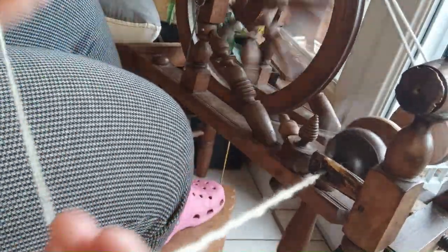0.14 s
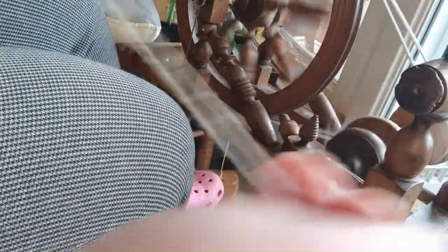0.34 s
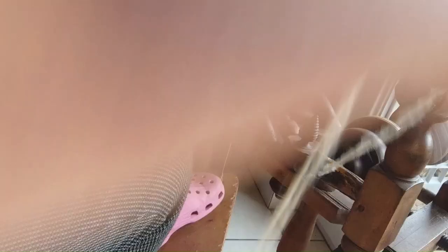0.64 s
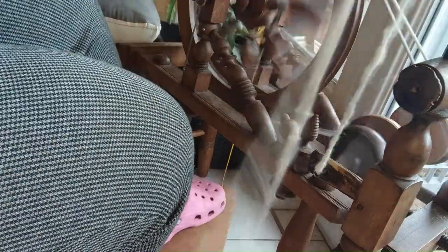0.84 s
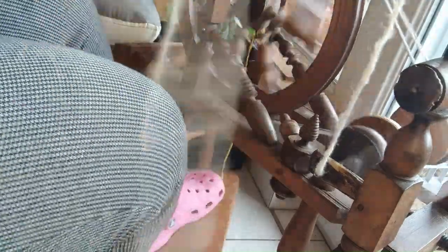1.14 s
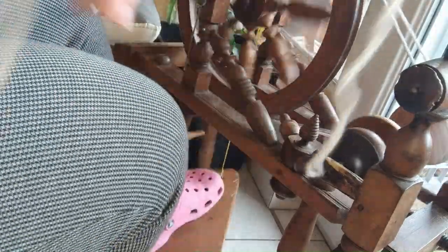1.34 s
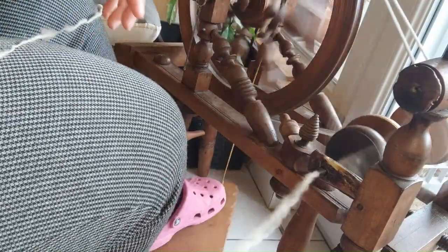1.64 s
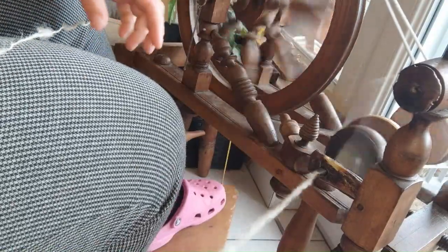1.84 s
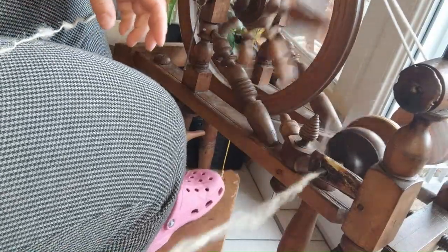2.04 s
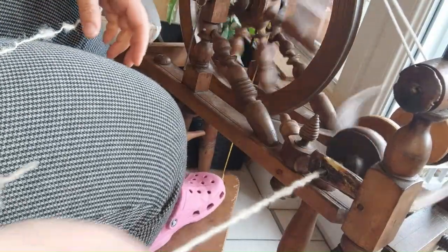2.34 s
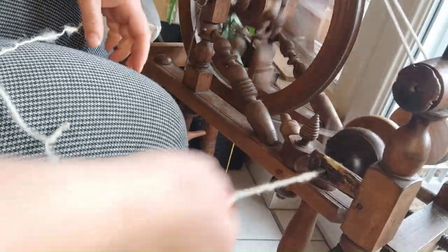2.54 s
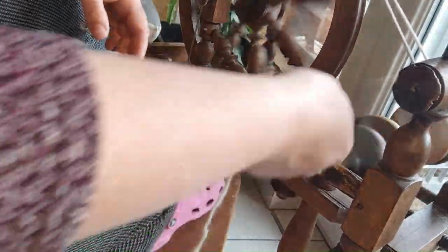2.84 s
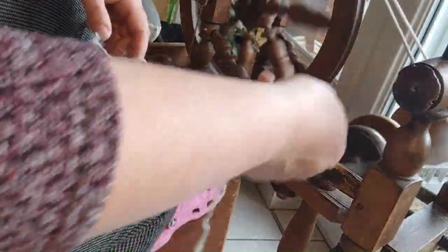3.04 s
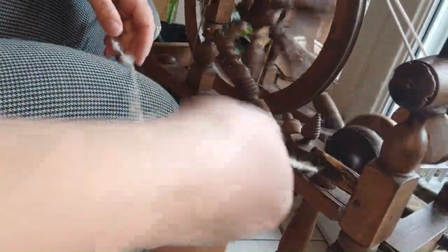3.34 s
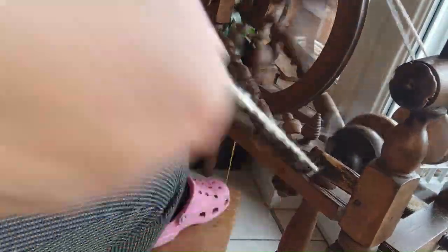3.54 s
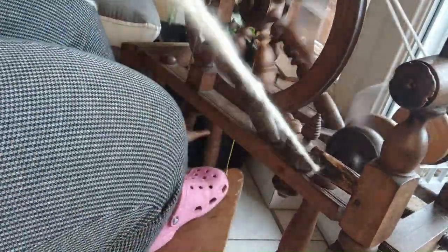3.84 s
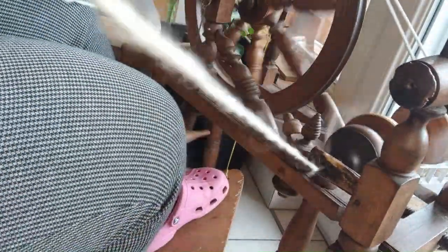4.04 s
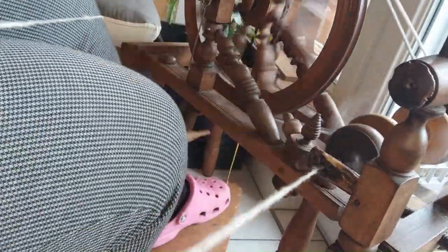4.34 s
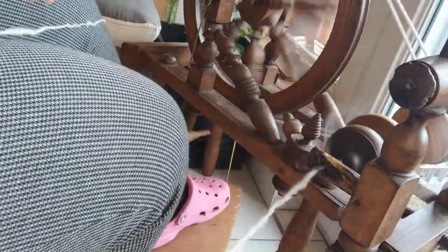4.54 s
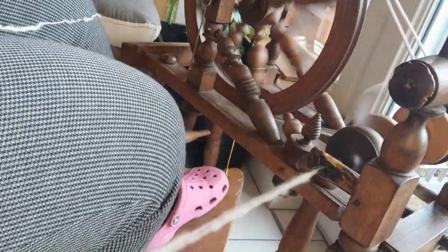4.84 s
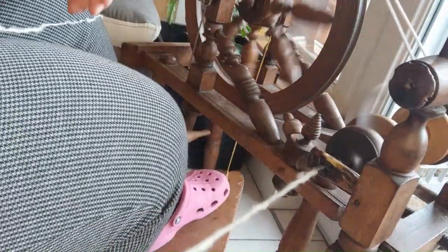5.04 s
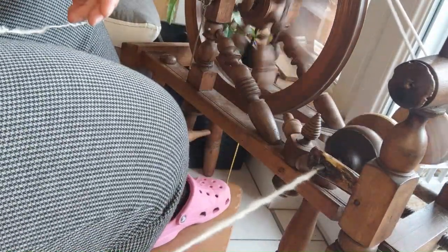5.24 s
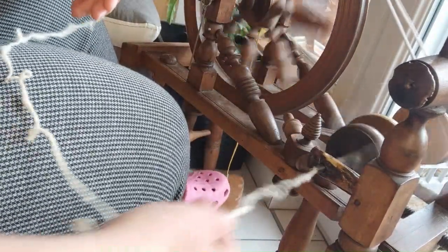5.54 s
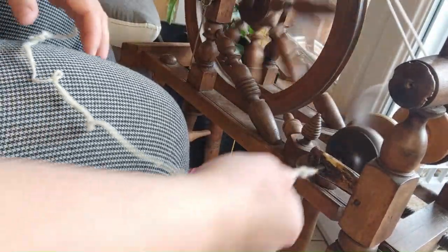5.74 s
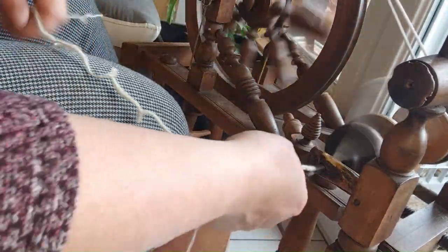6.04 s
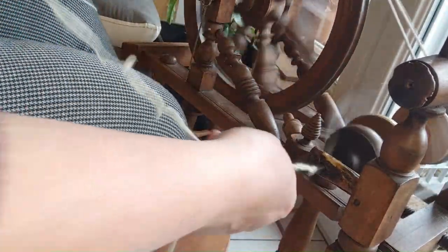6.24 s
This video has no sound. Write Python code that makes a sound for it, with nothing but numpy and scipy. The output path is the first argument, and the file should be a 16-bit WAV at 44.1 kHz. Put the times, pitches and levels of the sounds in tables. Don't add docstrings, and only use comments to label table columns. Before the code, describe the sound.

An old wooden spinning wheel runs close by, loose irregular wood knocks and bright steel ticks over a hissing rattle and low hum indoors.

```python
import sys
import numpy as np
from scipy import signal
from scipy.fft import rfft, irfft
from scipy.io import wavfile
from scipy.ndimage import uniform_filter1d

SR = 44100
rng = np.random.default_rng(int(sys.argv[2]) if len(sys.argv) > 2 else 0)


def wav_record(signal):
    frames = np.transpose(np.atleast_2d(signal))
    bounded = np.clip(frames, -1, 1)
    quanta = np.round(bounded * 32767).astype(np.int16)
    wavfile.write(sys.argv[1], SR, quanta)


def undo_db(level):
    steps = np.asarray(level, float) / 20
    return 10 ** steps


N = 282240

# pitch_hz, level_db, t60_s
WOOD_MODES = [(617, -11.5, 0.028), (860, -3.5, 0.038), (1081, -3, 0.03), (1250, -1, 0.016),
              (1714, -4, 0.034), (1906, 0, 0.022), (2107, 1.5, 0.028), (2330, 3.5, 0.013), (2540, 5, 0.019),
              (2790, -1, 0.018), (3228, -8, 0.035), (3675, -11, 0.041), (4110, 0.5, 0.018),
              (4490, -13, 0.025)]
# pitch_hz, level_db, t60_s
FRAME_MODES = [(216.3, -12, 0.17), (284.2, -5.5, 0.18), (319, -2.5, 0.14), (400.4, 1.5, 0.12),
               (472, -5, 0.09), (693, -9.5, 0.19)]
# start_s, steel_db, bobbin_db, strongest_ring_hz
SHAFT_SLAPS = [(0.197, -21.5, -33.5, 860), (0.836, -37, -26.5, 1930), (1.0326, -31, -19.5, 2200),
               (1.2974, -19, -25, 2190), (1.89, -30.5, -35, 2800), (2.0611, -18.5, -20, 2760),
               (2.423, -33.5, -61, 2200), (2.5836, -15, -28, 940), (2.6361, -32.5, -43, 1910),
               (2.7561, -17.5, -25, 2030), (2.814, -24.5, -22, 2130), (3.144, -35, -46.5, 861),
               (3.3697, -22.5, -21, 2200), (3.636, -29, -30.5, 1670), (3.6644, -22, -21.5, 2380),
               (3.768, -19.5, -18, 2330), (3.8225, -16, -25, 2640), (3.8883, -18.5, -18, 1970),
               (3.9551, -17, -21.5, 2860), (4.0408, -24, -23, 1950), (4.1306, -22, -30.5, 1700),
               (4.2477, -26.5, -24, 1990), (4.337, -26, -34.5, 2960), (4.4912, -19.5, -24, 2250),
               (4.6263, -23, -19, 2400), (5.3978, -17, -38, 2820), (5.662, -20.5, -35.5, 2550),
               (5.7709, -22.5, -29, 2000), (6.2736, -41, -25, 2540), (6.317, -31.5, -36, 856)]
# time_s, effort_db
DRIVE_EFFORT = [(0.0, 3.5), (0.3, 1), (0.66, -4.5), (1.03, 4.5), (1.35, -2), (1.68, -1), (1.94, 1),
                (2.19, -5), (2.64, 1.5), (3.15, -7), (3.53, 8), (3.75, 2), (4.25, -3), (4.51, 0.5),
                (5.0, -7), (5.42, 2), (5.75, -5), (6.4, 2)]


def band(x, lo_hz, hi_hz):
    sections = signal.butter(2, [lo_hz, hi_hz], "bandpass", fs=SR, output="sos")
    return signal.sosfilt(sections, x)


def unit(x):
    return x / np.sqrt(np.mean(x ** 2))


def colour(x, points):
    hz, db = np.transpose(points)
    f = np.maximum(np.arange(N // 2 + 1) * SR / N, 1)
    gain_db = np.interp(np.log(f), np.log(hz), db)
    return irfft(rfft(x) * undo_db(gain_db), N)


def pair(alike):
    common, left, right = rng.standard_normal((3, N))
    alike = np.clip(alike, 0, 1)
    return np.sqrt(alike) * common + np.sqrt(1 - alike) * np.array([left, right])


def walk(rate):
    hold = int(SR / rate)
    steps = np.repeat(rng.standard_normal(N // hold + 1), hold)
    smooth = uniform_filter1d(uniform_filter1d(steps, hold), hold)
    return unit(smooth[:N])


def ring(x, modes):
    out = 0
    for k, (hz, db, t60) in enumerate(modes):
        pole = np.exp(2j * np.pi * hz / SR - np.log(1000) / (t60 * SR))
        out = out + (-1) ** k * undo_db(db) * signal.lfilter([1], [1, -pole], x).imag
    return out


def swell(t, rise_s):
    return t / rise_s * np.exp(1 - t / rise_s)


def add(out, sound, s):
    i = int(s * SR)
    part = out[:, i:i + sound.shape[1]]
    part += sound[:, :part.shape[1]]


def struck(modes, lift_db, t, apart):
    hz, db, t60 = np.transpose(modes)[:, :, None]
    size, detune, phase, turn = rng.standard_normal((4, len(modes), 1))
    angle = 2 * np.pi * hz * (1 + 0.022 * detune) * t + phase
    waves = np.array([np.sin(angle + side * apart * turn * hz / 2000) for side in (-1, 1)])
    decay = undo_db(db + lift_db + 1.76 * size - 60 * t / t60)
    sound = (decay * waves).sum(axis=1)
    return sound / np.abs(sound.mean(axis=0)).max()


def all_knocks():
    # start_s, peak_db,
    # strongest_ring_hz
    lone_knocks = [(0.343, -33, 860), (0.9467, -20, 2200), (0.9896, -24, 2090), (1.0784, -27.5, 2790),
                   (1.135, -17.5, 2450), (1.1833, -26, 2150), (1.2453, -20, 2130), (1.3782, -20, 1960),
                   (1.7469, -22, 2330), (1.8407, -31, 2550), (1.9065, -26.5, 2350), (2.657, -24, 2540),
                   (3.4602, -31, 1920), (3.552, -27, 2500), (3.6026, -30, 1050), (3.716, -29, 1790),
                   (4.795, -30.5, 1250), (5.0833, -28, 900), (5.211, -31.5, 1860), (5.4497, -28, 1690),
                   (5.5052, -26.5, 1640), (5.8148, -31, 1280), (5.991, -25, 2030), (6.3843, -28.5, 2550),
                   (0.174, -34.5, 890), (0.3788, -38, 2550), (0.4581, -37.5, 2300), (0.8949, -35.5, 1750),
                  (1.8124, -32.5, 2500), (1.945, -34.5, 2250), (2.009, -35.5, 860), (2.0964, -35.5, 1810),
                  (2.3546, -38.5, 840), (2.461, -48, 2480), (2.9125, -33.5, 870), (2.9849, -35, 1230),
                  (3.3476, -38, 1610), (3.4976, -34.5, 2340), (4.378, -33, 1870), (4.4183, -32.5, 1667),
                  (4.573, -40.5, 1060), (4.705, -34.5, 2240), (4.8971, -40.5, 1210), (4.9715, -46.5, 1500),
                  (5.226, -38.5, 2500), (5.2965, -36, 2740), (5.5809, -33, 1190), (5.6219, -36.5, 1170),
                  (6.0998, -33.5, 740), (6.2073, -34, 1647)]
    lands_after_s = 0.0047
    landings = [(s + lands_after_s, db, hz) for s, _, db, hz in SHAFT_SLAPS]
    return landings + lone_knocks


def knocks():
    out, crack, t = np.zeros((2, N)), np.zeros((2, N)), np.arange(SR // 7) / SR
    wood_hz = np.transpose(WOOD_MODES)[0][:, None]
    for s, db, hz in all_knocks():
        thud_db = -48 + 0.55 * (db + 32) - db + 3 * rng.standard_normal()
        favour_db = 8.7 * np.exp(-(np.log(wood_hz / hz) / 0.31) ** 2)
        tilt_db = -1 * np.log2(wood_hz / 2000) * np.log2(2300 / hz)
        damping = (1 - np.exp(-t / 0.001)) * (0.4 + 0.61 * np.exp(-t / 0.0085))
        first = struck(WOOD_MODES, favour_db + tilt_db, t, apart=0.84) * damping
        gaps_s, sizes = rng.random((2, 2))
        bounces = np.cumsum(0.000702 + 0.002994 * gaps_s) * SR
        blow = first
        for k, at in enumerate(bounces):
            blow = blow + 0.72 * 1.02 ** k * sizes[k] * np.roll(first, int(at), axis=1)
        blow = blow / np.abs(blow.mean(axis=0)).max()
        thud = struck(FRAME_MODES, 0, t, apart=0.47) * (1 - np.exp(-t / 0.0033))
        add(out, undo_db(db) * (undo_db(0.5) * blow + undo_db(thud_db + 2.0) * thud), s - .0008)
        crack_db = db - 8.5 + 2.0 * np.log2(hz / 2300)
        add(crack, undo_db(crack_db) * (swell(t, 0.0015) + 0.31 * np.exp(-t / 0.022))[None], s - .0005)
    return out + crack * unit(band(band(pair(0.3), 600, 4730), 600, 4730))


def all_ticks():
    # start_s, peak_db, dull_part_db (relative to the
    shaft_ticks = [(0.013, -21, -30.5), (0.103, -23.5, -20), (0.111, -14.5, -26), (0.2913, -20.5, -20),
                   (0.38, -23.5, -11), (0.5269, -22, -48), (0.6852, -22.5, -23), (0.946, -34, -6),
                   (1.0774, -21.5, -21), (1.1034, -29, -14), (1.1343, -27, -11), (1.1507, -27, -15),
                   (1.1796, -22.5, -14), (1.451, -25.5, -11), (2.002, -18.5, -41), (2.122, -29.5, -17.5),
                   (2.2712, -24.5, -24), (2.461, -20.5, -13), (2.844, -20, -16), (3.1727, -26, -21),
                   (3.2956, -33, -25), (3.44, -23, -17.5), (3.4583, -19.5, -25), (3.5163, -27, -10),
                   (3.713, -23, -22), (4.4217, -28.5, -18), (4.6182, -20, -15), (5.453, -28, -16),
                   (4.844, -37, -8.5), (5.6968, -24.5, -13.5)]
    slaps = [(s, db, db - 21.5) for s, db, _, _ in SHAFT_SLAPS]
    further_ticks = [(s, db, db + dull_db) for s, db, dull_db in shaft_ticks]
    crackle = []
    for s, db, _ in all_knocks():
        growth_db = 1.38 * (db + 23.5)
        crackle.append((s - .0006, -42.5 + growth_db, -46.5 + growth_db))
    return slaps + further_ticks + crackle


def ticks():
    bright, dull, t = np.zeros((2, N)), np.zeros((2, N)), np.arange(SR // 5) / SR
    for s, db, dull_db in all_ticks():
        scrape_ms = 3.72 - 0.02 * (db + 28)
        tail = 0.1 * np.exp(-t / 0.044) + 0.063 * np.exp(-t / 0.038)
        shape = swell(t, 0.51 * max(scrape_ms, 1) / 1000) + (1 - np.exp(-t / 0.002)) * tail
        add(bright, undo_db(db - 8.5) * shape[None], s - .0008)
        add(dull, undo_db(dull_db + 8.0) * shape[None], s - .0008)
    steel = pair(0.21) * undo_db(1.03 * walk(1500))
    return band(bright * steel, 5860, 13500) + band(dull * steel, 2900, 7940)


def grit(rate, scatter_db):
    hit = rng.random(N) < rate / SR
    size = np.minimum(rng.exponential(size=N), 3)
    return hit * undo_db(scatter_db * size) * np.sign(rng.standard_normal(N))


def running(hiss_db, rattle_db, drone_db):
    flutter = 2.5 + .5 * unit(signal.lfilter([1], [1, -.985], np.abs(grit(170, scatter_db=1.0))))
    hiss = unit(band(pair(0.019) * flutter * undo_db(0.48 * walk(17)), 3940, 22000))
    drive = unit(grit(300, scatter_db=7.5)) + 0.82 * pair(0.036)
    rattle = unit(ring(drive * undo_db(2.54 * walk(25)), WOOD_MODES))
    scuff_level = undo_db(np.minimum(6.0 * walk(60), 12))
    scuff = unit(band(pair(0.24) * scuff_level, 420, 5900))
    drone = unit(ring(pair(0.76) * undo_db(0.89 * walk(17)), FRAME_MODES))
    wooden = undo_db(rattle_db + 4.5) * (rattle + 0.98 * scuff)
    return undo_db(hiss_db + 2.0) * hiss + wooden + undo_db(drone_db - 0.1) * drone


def stamps():
    # start_s, peak_db
    treadle_stamps = [(0.109, -38.5), (0.841, -34.5), (0.9465, -34), (1.1821, -40), (1.378, -38),
                      (1.75, -40), (2.096, -41), (2.588, -32.5), (2.657, -36.5), (2.76, -34), (2.819, -39),
                      (2.913, -39), (2.985, -45), (3.893, -34), (4.496, -38), (5.211, -36), (5.584, -35.5),
                      (5.681, -47), (5.815, -38.5), (6.099, -41), (6.21, -42)]
    out, t = np.zeros((2, N)), np.arange(SR // 4) / SR
    for s, db in treadle_stamps:
        blow = struck(FRAME_MODES, 0, t, apart=0.44) * (1 - np.exp(-t / 0.0035))
        add(out, undo_db(db) * blow, s)
    return out


def hum():
    # peak_s, peak_db, pitch_hz
    strong_jolts = [(0.125, -47.5, 115), (0.32, -48.5, 106), (0.431, -48.5, 103), (0.534, -49, 104),
                    (0.948, -48, 110.5), (1.034, -47, 110.2), (1.204, -48, 97.5), (1.273, -52, 98.3),
                    (1.358, -49, 102.3), (1.477, -47, 106.6), (1.768, -42, 107.8), (2.056, -49, 99.4),
                    (2.602, -52, 97.4), (2.679, -45, 110.3), (3.027, -51.5, 105.4), (3.49, -49, 110),
                    (3.572, -47, 108.3), (3.685, -48, 109.6), (3.82, -50.5, 105.4), (3.969, -49.5, 108),
                    (4.072, -50, 98.6), (4.394, -53, 106), (4.518, -42, 107), (4.58, -44, 113),
                    (4.688, -48.5, 107.7), (4.92, -51, 102.7), (5.38, -41.5, 110), (5.604, -50.5, 98),
                    (5.86, -51.5, 108), (6.236, -46.5, 113.4)]
    out, t = np.zeros((2, N + SR // 10)), np.arange(SR // 5) / SR
    late, size, pitch = rng.standard_normal((80, 3)).T
    turns_s = (np.arange(len(late)) + 0.198 * late.clip(-2, 2) + .5) / 11.5
    wobble_db = -55.5 + 3.1 * size + 0.43 * np.interp(turns_s, *np.transpose(DRIVE_EFFORT))
    wobbles = list(zip(turns_s, wobble_db, 104 * (1 + 0.06 * pitch)))
    for s, db, hz in strong_jolts + wobbles:
        jolt = np.exp(-((t - .1) / 0.038) ** 2) * np.sin(2 * np.pi * (hz * t + rng.random()))
        add(out, undo_db(db - 2.5) * jolt[None], s)
    floorboard = unit(ring(pair(0.83), [(81.8, 0, 0.24)]))
    return out[:, SR // 10:] + undo_db(-67.5) * floorboard


def squeak():
    # time_s, pitch_hz, level_db
    song = [
        (3.22, 528, -74),
        (3.27, 528, -60),
        (3.31, 536, -54),
        (3.40, 534, -47),
        (3.425, 536, -62),
        (3.45, 532, -75),
    ]
    s, hz, db = np.transpose(song)
    t = np.arange(N) / SR
    pitch_hz = np.interp(t, s, hz) * (1 + 0.0052 * walk(47.0))
    phase = 2 * np.pi * np.cumsum(pitch_hz) / SR
    level_db = np.interp(t, s, db, left=-120, right=-120)
    return np.sqrt(2) * undo_db(level_db) * np.sin(phase)


def air():
    # pitch_hz, level_db (per Hz)
    room_spectrum = [(12, -32), (20, -28), (109, -7), (169, -12), (398, -14.5), (561, -16.5), (850, -22),
                     (1490, -26.5), (2500, -16.5), (4850, -26), (7000, -27), (9100, -47), (15400, -120)]
    tone = band(pair(0.79), 46, 610) + band(pair(0.2), 430, 19000)
    draught = unit(band(pair(0.041), 0.93, 32)) * undo_db(0.56 * walk(13))
    return undo_db(-57.5) * unit(colour(tone, room_spectrum)) + undo_db(-58.0) * draught


def walls(x, t60, wet_db):
    t = np.arange(SR // 2) / SR
    tail = rng.standard_normal((2, len(t))) * undo_db(-60 * t / t60) * (t > .002)
    tail = tail / np.sqrt((tail ** 2).sum(axis=1, keepdims=True))
    wet = signal.fftconvolve(x.mean(axis=0)[None], tail, axes=1)[:, :N]
    return x + undo_db(wet_db) * wet


def scene():
    effort_db = np.interp(np.arange(N) / SR, *np.transpose(DRIVE_EFFORT))
    wooden_hits = walls(knocks() + stamps(), t60=0.38, wet_db=-6.5)
    steel_hits = walls(ticks(), t60=0.49, wet_db=-33.0)
    turning = running(
        hiss_db=-52 + 1 * effort_db, rattle_db=-57 + 1.68 * effort_db, drone_db=-61.5 + 0.97 * effort_db)
    steady = turning + hum() + squeak() + air()
    return wooden_hits + steel_hits + colour(steady, [(100, -0.5), (14200, -2.0), (14600, -40)])


def roll_off(x):
    return signal.sosfilt(signal.butter(12, 16400, fs=SR, output="sos"), x)


def record(dry):
    # pitch_hz, gain_db
    left_port = [(100, 1.5), (3000, -2), (5500, -3), (7500, -2), (8600, 5), (9400, 2), (10400, 10),
                 (11000, 8.5), (11800, 10.5), (13000, 0.5), (13700, 5), (14600, -19), (16400, -24)]
    # pitch_hz, gain_db
    right_port = [(100, 1), (3000, -3.5), (5500, -1.5), (7500, 1), (8300, 8.5), (8750, 13), (9400, 8),
                  (10400, -2), (11800, -5.5), (13000, -18), (13700, -8), (14600, -22), (16400, -32)]
    left = colour(dry[0], left_port)
    right = np.roll(colour(dry[1], right_port), 5)
    return roll_off(np.array([left, right]))


dry = scene()
out = record(dry)
wav_record(out)
```